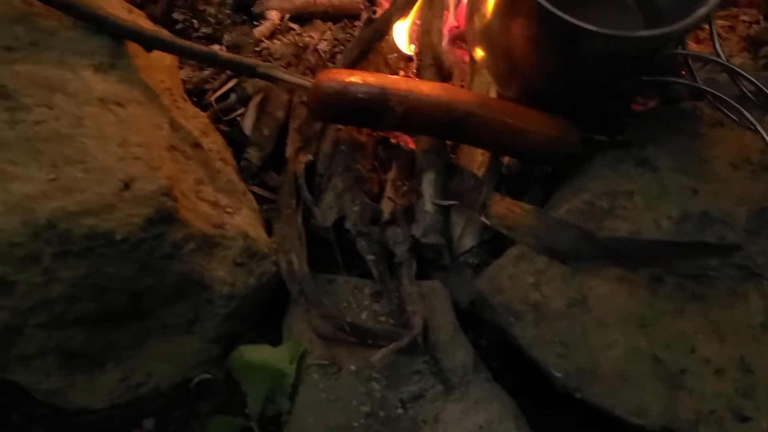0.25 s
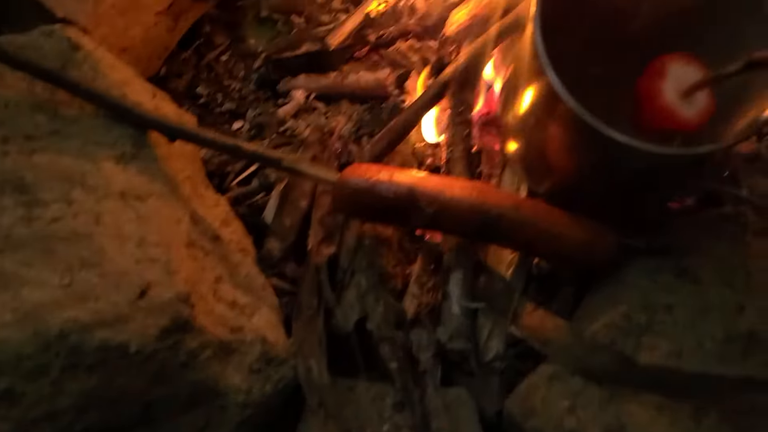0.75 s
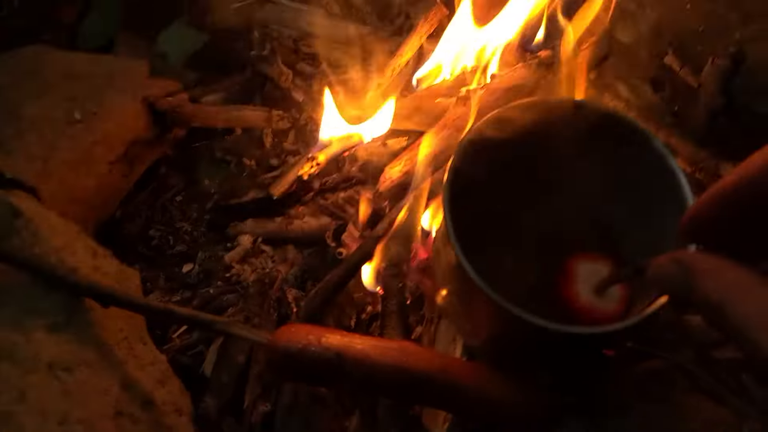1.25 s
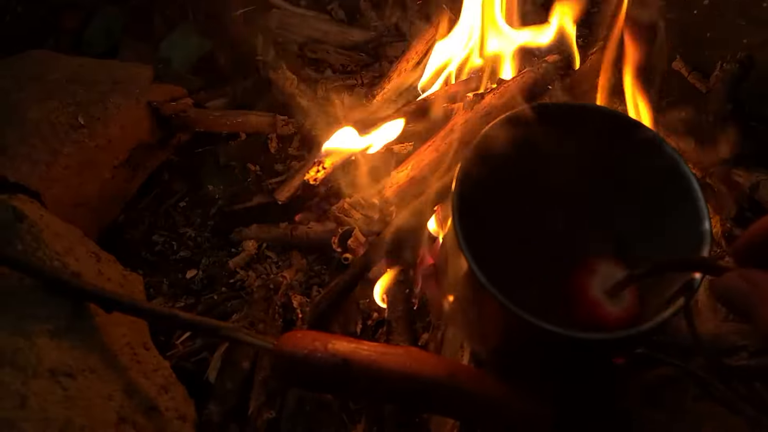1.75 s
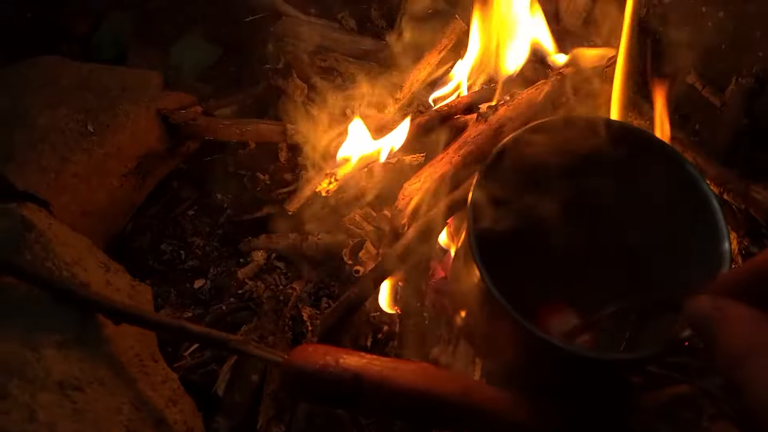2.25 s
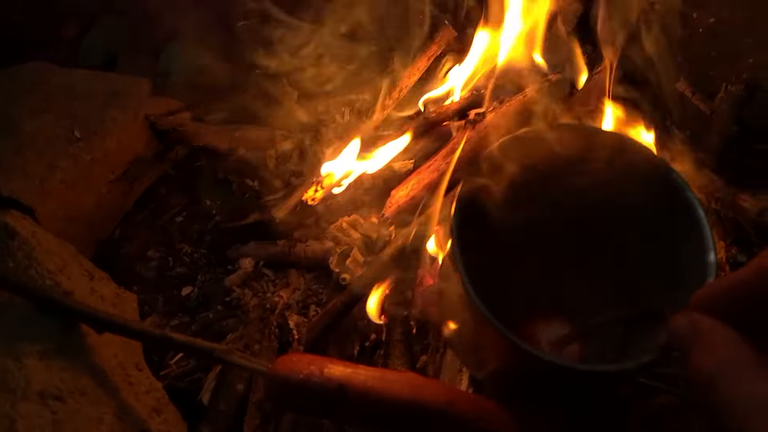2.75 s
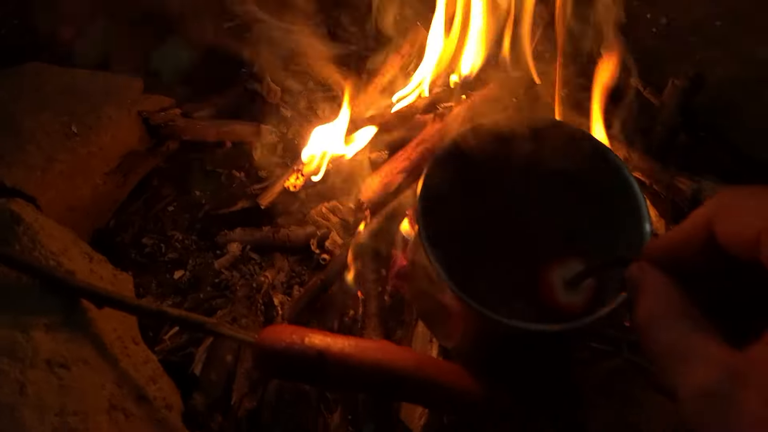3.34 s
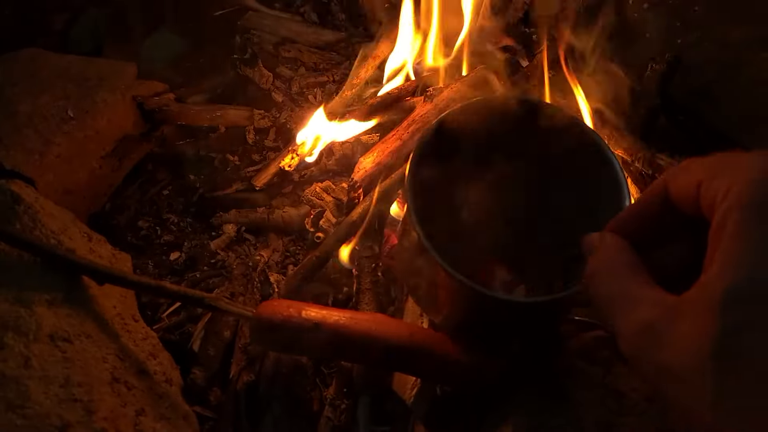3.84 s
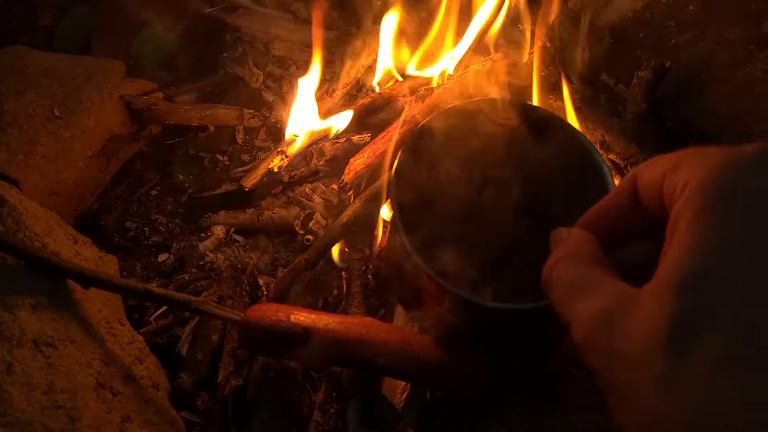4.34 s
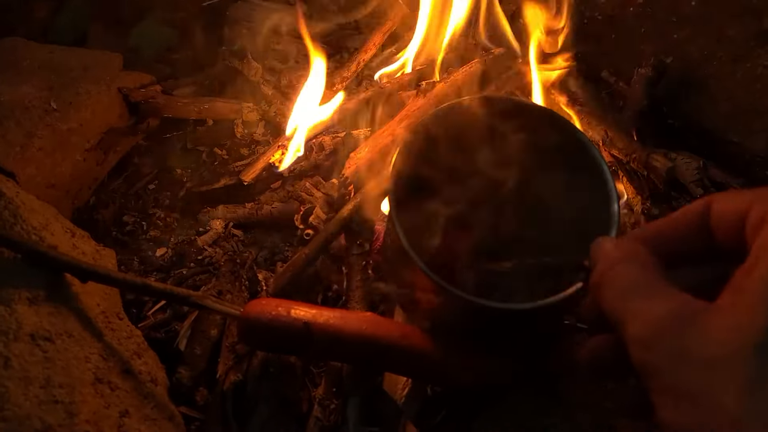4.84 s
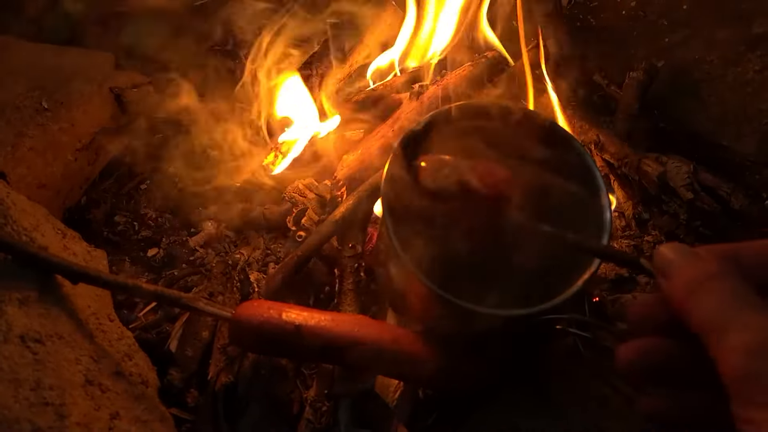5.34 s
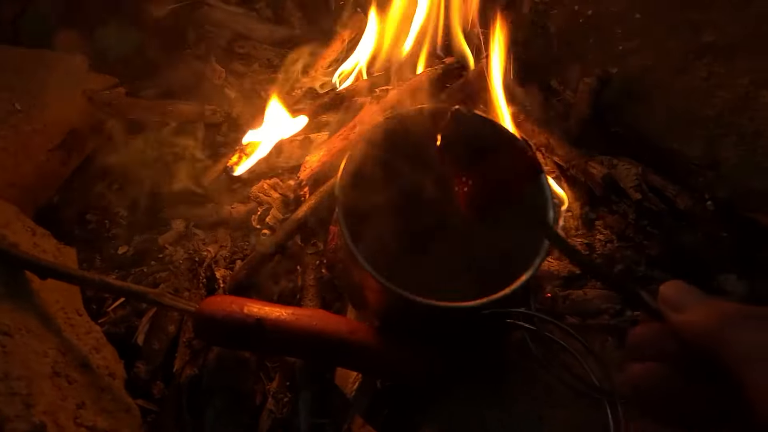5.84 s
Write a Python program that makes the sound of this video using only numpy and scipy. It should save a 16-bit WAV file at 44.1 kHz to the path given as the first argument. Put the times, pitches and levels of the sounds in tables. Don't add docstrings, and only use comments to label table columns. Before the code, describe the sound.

A small campfire is heard very close in stereo outdoors. Its dominant sound is a bassy, ragged flutter with a softer roar above, swelling at the start and again around 0.4-0.6 s, then dipping sharply near 1.4 s and wavering throughout. Thin sizzling steam grows slightly by 2 s and persists. Soft, falling gas thumps come around 0.3-0.4, 1.9, 3.1, 4.6, 5.5 and 5.8 s. Dry snaps and tiny ticks, mostly left of centre, are sparse at first, busy from 1.3 to 3 s, sharp near 3.7 and 4.2 s, then sparser until a bright pair at 5.5 s. Breathy gas jets swell faintly around 1.3-2.2, 3.4-3.8 and 5.6-5.9 s. A stick gives dull, short pot knocks, notably at 3.3, 3.7 and 5.1-5.8 s. Distant thrush notes glide up and down faintly, blurred by trees.

```python
import sys
import numpy as np
from scipy import signal
from scipy.fft import rfft, irfft, next_fast_len
from scipy.io import wavfile
from scipy.ndimage import uniform_filter1d, map_coordinates

SR = 44100
rng = np.random.default_rng(int(sys.argv[2]) if len(sys.argv) > 2 else 0)


def wav_record(signal):
    frames = np.transpose(np.atleast_2d(signal))
    bounded = np.clip(frames, -1, 1)
    quanta = np.round(bounded * 32767).astype(np.int16)
    wavfile.write(sys.argv[1], SR, quanta)


def voltage_ratio(decibels):
    exponent = np.asarray(decibels, float) / 20
    return 10 ** exponent


N = 268657

# f/Hz, level/dB per Hz
HOUSING_TONE = [(350, -17), (600, -9.5), (711, -4), (901, 1), (1130, 1), (1620, -6), (1940, -2.5),
                (3860, -5.5), (5010, -9), (6710, -1.5), (7600, -5.5), (8900, -22), (11600, -38),
                (19600, -120)]
# f/Hz, level/dB per Hz
TREBLE_TONE = [(8500, -31.5), (9300, 1), (10000, -7), (11100, -2.5), (12400, -0.5), (13900, -2.5),
               (15000, -1.5), (15800, -12), (16600, -21)]
FIRE_PAN_DB, PAN_SPREAD_DB = 6, 2.5


def unit(x):
    return x / np.sqrt(np.mean(x ** 2) + 1e-20)


def along(points, hz):
    f, v = np.transpose(points)
    return np.interp(np.log(hz + 1), np.log(f + 1), v)


def curves(rows):
    s, *columns = np.transpose(rows)
    return [np.interp(np.arange(N) / SR, s, column) for column in columns]


def bumps(events, half_s):
    t = np.arange(N) / SR
    return sum(db * np.exp(-((t - s) / half_s) ** 2) for s, db in events)


def wobble(rate):
    points = rng.standard_normal(int(N * rate / SR) + 4)
    return map_coordinates(points, [np.arange(N) * rate / SR])


def filtered(x, response):
    m = next_fast_len(N + SR // 2)
    return irfft(rfft(x, m) * response(np.fft.rfftfreq(m, 1 / SR)), m)[..., :N]


def band(tone, lo_hz, hi_hz):
    def response(hz):
        edges = (1 + (lo_hz / (hz + 1)) ** 8) * (1 + (hz / hi_hz) ** 8)
        return voltage_ratio(along(tone, hz)) / np.sqrt(edges)
    return response


def rush(colour, patchy_db, grain_db):
    # f/Hz, likeness (1 = same)
    likeness = [(60, 0.98), (130, 0.98), (330, 0.89), (760, 0.51), (1300, -0.1), (3100, 0.11),
                (6820, -0.086), (15000, 0.068)]
    # f/Hz, left minus right/dB
    side_lean = [(60, 0.5), (110, -2), (200, 1), (380, -3.5), (700, -1.5), (1290, 3.5), (2380, -1.5),
                 (4400, 1), (8120, 3), (15000, 1.5)]
    white = rng.standard_normal((2, N)) * voltage_ratio(grain_db * np.abs(wobble(300)) ** 2)
    z = signal.stft(white, nperseg=512)[2]
    patches = uniform_filter1d(rng.standard_normal(z.shape[1:]), 6, 0)
    patches = uniform_filter1d(patches, 8, 1)
    pair = signal.istft(z * voltage_ratio(patchy_db * unit(patches)), nperseg=512)[1][:, :N]

    def mid_side(hz):
        angle = np.arccos(np.clip(along(likeness, hz), -1, 1)) / 2
        return colour(hz) * [np.cos(angle), np.sin(angle)]

    def lean(hz):
        return voltage_ratio(np.outer([0.5, -0.5], along(side_lean, hz)))

    mid, side = filtered(pair, mid_side)
    return unit(filtered(np.array([mid + side, mid - side]), lean))


def evened(x, seconds, share):
    level = uniform_filter1d(np.mean(x ** 2, 0), round(seconds * SR)) + 0.09
    return unit(x / np.abs(level) ** (share / 2))


def add(track, s, sound, pan_db):
    part = track[:, round(s * SR):][:, :np.shape(sound)[-1]]
    panned = voltage_ratio([[pan_db / 2], [-pan_db / 2]]) * sound
    part += panned[:, :part.shape[1]]


def knocks(events, width, gain_db, t60, pan_db):
    out, t = np.zeros((2, N)), np.arange(SR // 8) / SR
    envelope = voltage_ratio(-60 * t / t60) * (1 - np.exp(-t / 0.0005))
    for s, db, hz in events:
        burst = rng.standard_normal((2, len(t))) * envelope
        mode = signal.iirpeak(hz, 1 / width, SR)
        rung = signal.lfilter(*mode, signal.lfilter(*mode, burst))
        knock = voltage_ratio(db + gain_db) * rung / np.abs(rung).max()
        add(out, s, knock, rng.normal(pan_db, PAN_SPREAD_DB))
    return out


def flames():
    # t/s, flutter level/dB, extra roar/dB
    burning = [(0.0, -53.5, -1.5), (0.17, -51.5, -1), (0.39, -45.5, -0.5), (0.56, -44, 2), (0.68, -56, 0.5),
               (0.88, -51.5, 0.5), (1.6, -50.5, -1), (2.4, -52.5, 0.5), (2.8, -51, 1), (3.15, -50, -1.5),
               (3.45, -53, 1.5), (3.75, -50, 0), (3.95, -52, -2), (4.25, -51, -0.5), (4.75, -51, 0.5),
               (5.4, -48.5, 0), (5.75, -50.5, 3), (6.09, -55, 0.5)]
    # t/s, rise/dB
    flares = [(0.0, 11.5), (1.34, 4), (1.68, 1), (2.44, 0.5), (2.65, 4.5), (2.88, 5), (3.24, 6), (3.69, 0),
              (4.29, 5.5), (4.59, 5), (5.5, 2), (5.68, -0.5)]
    # t/s, change/dB
    lulls = [(0.06, -2.5), (0.7, 0), (1.29, -3), (1.375, -12), (1.63, -7), (2.56, -3), (2.95, -4.5),
             (3.34, -3), (4.39, -8), (4.635, -5), (5.83, -2)]
    # f/Hz, level/dB per Hz
    flame_tone = [(12, -36), (20, -15.5), (55, 0), (75, 1), (146, -11), (187, -8), (322, -22), (625, -30),
                  (800, -45.5), (1040, -43), (1760, -120)]
    burn_db, ragged_db = curves(burning)
    swell_db = burn_db + bumps(flares, half_s=0.025)
    lull_db = bumps(lulls, half_s=0.021)
    lick = wobble(25)
    flutter_db = swell_db + lull_db + 0.49 * lick
    roar_db = -56 + ragged_db + 0.21 * (swell_db - swell_db.mean()) + 0.65 * lull_db
    roar_db = roar_db + 0.14 * lick + 0.97 * wobble(60)
    flutter = rush(band(flame_tone, 38, 151.5), patchy_db=1.0, grain_db=-1)
    flutter = evened(flutter, seconds=0.0656, share=0.99)
    roar = rush(band(flame_tone, 125.3, 20000), patchy_db=0.8, grain_db=0.8)
    roar = evened(roar, seconds=0.046, share=0.36)
    return voltage_ratio(flutter_db) * flutter + voltage_ratio(roar_db) * roar


def whumps():
    # t/s, peak level/dB, f/Hz, length/s
    ignitions = [
        (0.329, -30, 82.7, 0.044),
        (0.396, -26.5, 69, 0.013),
        (0.837, -39, 68.6, 0.047),
        (1.661, -46, 72.7, 0.042),
        (1.855, -28, 72.5, 0.013),
        (3.131, -32, 88.8, 0.027),
        (3.688, -41, 70.4, 0.03),
        (4.586, -32.5, 85, 0.05),
        (5.481, -33, 74, 0.042),
        (5.827, -29, 78.4, 0.023),
    ]
    out = np.zeros((2, N))
    for s, db, hz, length in ignitions:
        t = np.arange(round(length * SR)) / SR
        u = t / t[-1]
        push = np.sin(np.pi * u) * (1 - u) * np.sin(2 * np.pi * hz * t * (1.6 - 0.89 * u))
        add(out, s, voltage_ratio(db - 1.8) * (push - push.mean()), 0)
    return out


def sizzle():
    # t/s, level/dB
    steam = [(0.0, -63.5), (0.27, -63.5), (1.08, -61), (2.14, -60), (3.15, -62), (3.6, -61), (4.51, -62.5),
             (4.99, -61.5), (5.55, -62), (5.71, -61), (6.09, -62)]
    steam_db, = curves(steam)
    flow_db = steam_db - steam_db.mean()
    surge = 0.16 * wobble(16) + 0.5 * wobble(45)
    hiss = rush(band(HOUSING_TONE, 1, 2800), patchy_db=0.6, grain_db=0.15)
    fizz = rush(band(HOUSING_TONE, 2800, 8600), patchy_db=1.1, grain_db=0.4)
    spit = rush(lambda hz: voltage_ratio(along(TREBLE_TONE, hz)) * (hz < 15830), patchy_db=0.8, grain_db=0.4)
    hiss_db = -64 + 0.16 * flow_db + 0.25 * surge
    fizz_db = -59 + flow_db + 1.45 * surge
    spit_db = -67.5 + 0.48 * flow_db + 1.2 * surge
    return voltage_ratio(hiss_db) * hiss + voltage_ratio(fizz_db) * fizz + voltage_ratio(spit_db) * spit


def snaps():
    # t/s, peak level/dB, body level against the peak/dB
    bursts = [(0.059, -49, -12), (0.5417, -49.5, -0.5), (0.5931, -48, -9), (0.9772, -58, 2),
              (1.2436, -57, -8), (1.8397, -62, -6), (1.8672, -54, -6), (1.949, -50, -2), (2.2134, -48, 1),
              (2.2667, -49, -5), (2.3052, -47, -3), (2.394, -48.5, -3), (2.5401, -52, -7),
              (2.5686, -45, -6), (2.653, -45, -11), (2.69, -48, -13), (3.017, -50, -12), (3.1293, -51, -14),
              (3.4346, -52, -7), (3.6132, -50, -12), (3.692, -40, -5), (3.6975, -48, 3),
              (3.7958, -44.5, -3), (3.8841, -49, -9), (4.1135, -46, -17), (4.1966, -42, -8),
              (4.788, -46, -5), (5.0449, -47, -14), (5.529, -41, -17), (5.5438, -42, -19)]
    top, body, t = np.zeros((2, N)), np.zeros((2, N)), np.arange(SR // 20) / SR
    envelope = 0.35 * voltage_ratio(-60 * t / 0.0083) + 0.055 * voltage_ratio(-60 * t / 0.073)
    for s, db, body_db in bursts:
        pan_db = rng.normal(FIRE_PAN_DB, PAN_SPREAD_DB)
        burst = rng.standard_normal((2, len(t))) * envelope
        burst[:, 0] = 0.55
        add(top, s, voltage_ratio(db) * burst, pan_db)
        add(body, s, voltage_ratio(db + body_db) * burst, pan_db)
    bright = voltage_ratio(12.0) * filtered(top, band(TREBLE_TONE, 12200, 30000))
    return bright + voltage_ratio(18.5) * filtered(body, band(HOUSING_TONE, 2600, 10000))


def twigs():
    # t/s, peak level/dB, f/Hz
    thick = [(1.0061, -58, 3770), (1.3044, -50, 3910), (1.3187, -48, 3960), (1.3694, -52, 3880),
             (1.715, -51, 4170), (1.7594, -49.5, 4080), (1.7978, -56, 4300), (1.8635, -48.5, 4200),
             (1.9192, -54, 3870), (1.9535, -50.5, 3670), (2.0522, -48, 4100), (2.1635, -49.5, 3530),
             (2.2797, -48, 3700), (2.5294, -50, 4020), (2.5521, -53.5, 4410), (2.6677, -49.5, 3980),
             (2.8015, -52, 4050), (2.8894, -52, 4470), (3.3094, -49.5, 3940), (3.5794, -53, 4180),
             (3.691, -56, 3700), (3.813, -53, 3980)]
    # t/s, peak level/dB, f/Hz
    thin = [(0.5132, -55, 6000), (0.644, -48, 6400), (0.819, -51.5, 6650), (1.002, -50, 6300),
            (1.0849, -48.5, 6480), (1.4394, -52, 7140), (2.1455, -52, 6370), (2.6524, -48, 6580),
            (2.9662, -56, 6020), (4.506, -53, 6100), (5.0335, -54, 6750), (5.7503, -50, 6500)]
    ticks = knocks(thick, width=0.22, gain_db=0.5, t60=0.044, pan_db=FIRE_PAN_DB)
    return ticks + knocks(thin, width=0.19, gain_db=4.0, t60=0.027, pan_db=FIRE_PAN_DB)


def gas_puffs():
    # t/s, length/s, centre f/Hz, width/Hz, level/dB
    jets = [
        (3.41, .15, 1040, 250, -60),
        (1.28, .13, 4150, 1200, -65),
        (3.58, .2, 2900, 700, -66),
        (1.62, .6, 4100, 1200, -68),
        (3.705, .04, 1000, 900, -59),
        (5.6, .28, 3200, 600, -68),
    ]
    out = np.zeros((2, N))
    for s, length, centre_hz, width_hz, db in jets:
        swell = np.hanning(round(length * SR))
        mode = signal.iirpeak(centre_hz, centre_hz / width_hz, SR)
        noise = rng.standard_normal((2, len(swell)))
        jet = signal.lfilter(*mode, signal.lfilter(*mode, noise))
        add(out, s, voltage_ratio(db) * swell * unit(jet), 0)
    return out


def stick_on_pot():
    # t/s, peak level/dB, f/Hz
    hits = [(0.092, -57, 1020), (0.503, -58, 528), (0.937, -58, 934), (1.106, -58, 353), (1.949, -59, 427),
            (2.499, -55, 358), (2.769, -62, 450), (3.31, -51, 384), (3.697, -55, 453), (3.724, -52.5, 414),
            (5.095, -56, 380), (5.171, -55.5, 564), (5.489, -56, 439), (5.673, -49.5, 333),
            (5.749, -57, 732), (5.826, -51, 320)]
    return knocks(hits, width=0.59, gain_db=4.8, t60=0.049, pan_db=-0.5)


def thrush():
    # t/s, length/s, from f/Hz, to f/Hz, level/dB
    rising = [(0.013, 0.08, 1880, 2040, -59), (.09, 0.031, 2080, 2210, -60),
              (1.334, 0.091, 2150, 2620, -67), (1.967, 0.036, 2120, 2420, -60),
              (2.156, 0.11, 2380, 2610, -61), (2.24, 0.069, 3000, 3660, -68), (2.393, .04, 2200, 2420, -65),
              (2.74, 0.044, 3300, 3560, -68), (2.87, 0.055, 2200, 2670, -63),
              (3.622, 0.044, 1950, 2010, -63), (3.635, 0.04, 2590, 2850, -61),
              (3.725, 0.06, 2900, 3130, -65), (4.652, 0.051, 2350, 2820, -61),
              (5.664, 0.069, 2650, 3080, -62), (5.703, 0.029, 3150, 3500, -59),
              (5.72, .045, 3750, 4130, -62)]
    # t/s, length/s, from f/Hz, to f/Hz, level/dB
    falling = [(.38, 0.1, 3200, 2680, -65), (.46, 0.057, 2900, 2730, -59), (0.502, .11, 2715, 2090, -61.5),
               (1.05, 0.077, 3200, 3190, -65), (1.102, 0.058, 3050, 2530, -64),
               (1.93, 0.037, 2150, 2140, -63), (2.286, 0.084, 2650, 2330, -60.5),
               (2.978, 0.047, 2750, 2000, -63), (3.586, 0.045, 3200, 2510, -61.5),
               (4.25, 0.06, 2700, 2200, -69), (4.717, 0.044, 2650, 2420, -61), (4.73, 0.1, 2200, 2150, -63),
               (4.798, 0.058, 3400, 3240, -66), (4.85, 0.035, 2950, 2700, -71),
               (5.632, 0.057, 3400, 3320, -69)]
    out = np.zeros((2, N))
    for s, length, from_hz, to_hz, db in rising + falling:
        u = np.linspace(0, 1, round(length * SR))
        glide_hz = from_hz + (to_hz - from_hz) * u
        note = np.sin(np.pi * u) * np.sin(2 * np.pi * np.cumsum(glide_hz) / SR)
        add(out, s, voltage_ratio(db) * note, -3)
    t = np.arange(SR // 2) / SR
    trees = rng.standard_normal((2, len(t))) * voltage_ratio(-60 * t / 0.3)
    echoes = signal.fftconvolve(out, trees / np.linalg.norm(trees[0]), axes=1)[:, :N]
    shimmer = voltage_ratio(2.5 * np.array([wobble(40), wobble(40)]))
    return voltage_ratio(-3.5) * (shimmer * out + voltage_ratio(-3) * echoes)


def scene():
    fire = flames() + whumps() + sizzle() + snaps() + twigs() + gas_puffs()
    return fire + stick_on_pot() + thrush()


def low_pass(x):
    return signal.sosfilt(signal.butter(12, 15830, fs=SR, output="sos"), x)


def record(dry):
    return low_pass(dry)


dry = scene()
out = record(dry)
wav_record(out)
```